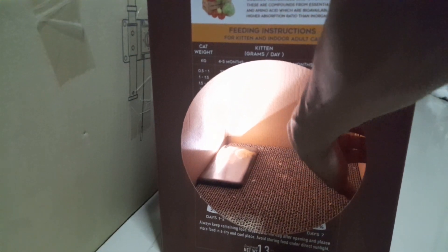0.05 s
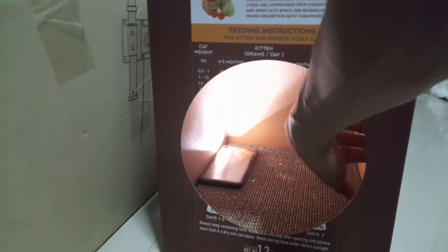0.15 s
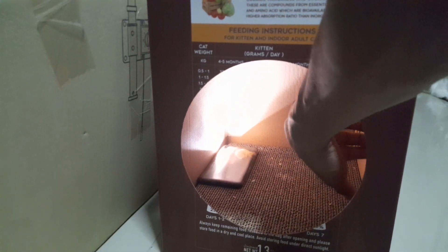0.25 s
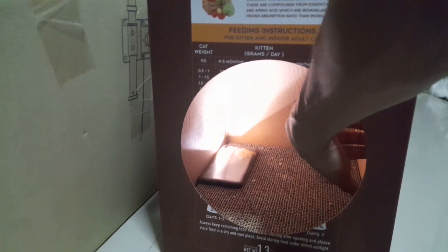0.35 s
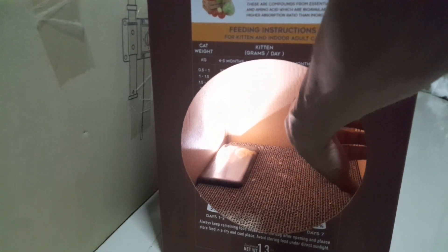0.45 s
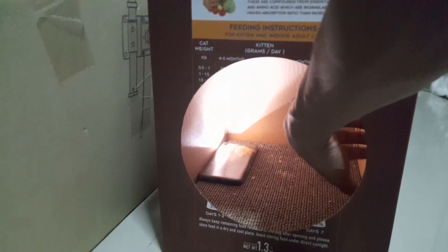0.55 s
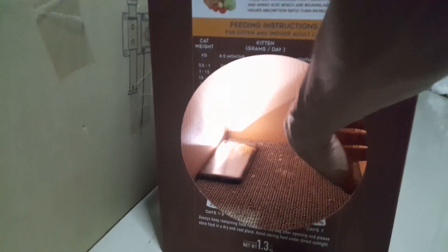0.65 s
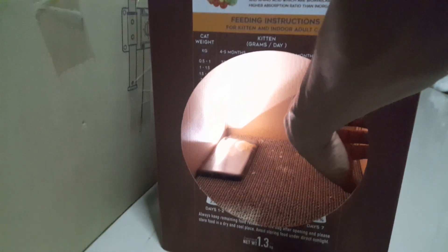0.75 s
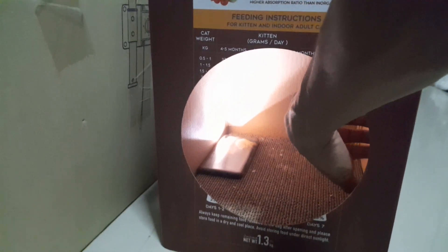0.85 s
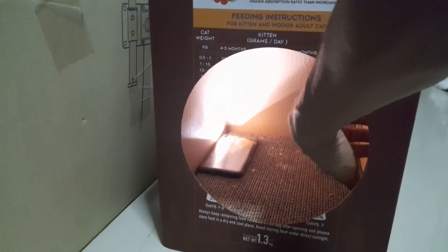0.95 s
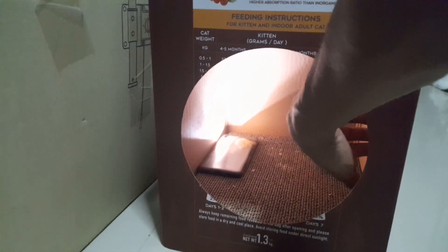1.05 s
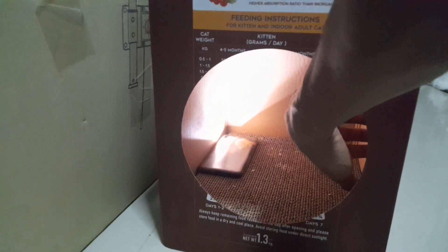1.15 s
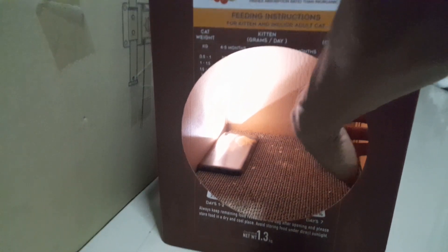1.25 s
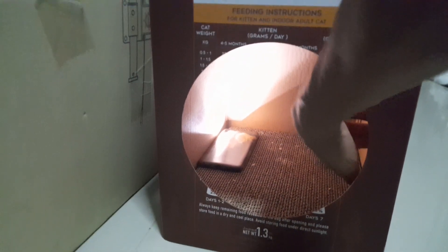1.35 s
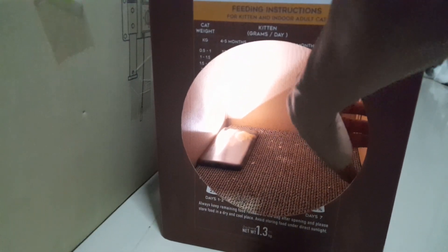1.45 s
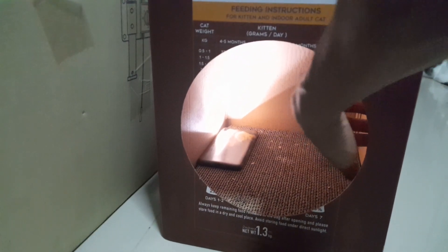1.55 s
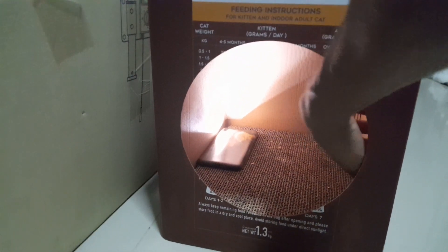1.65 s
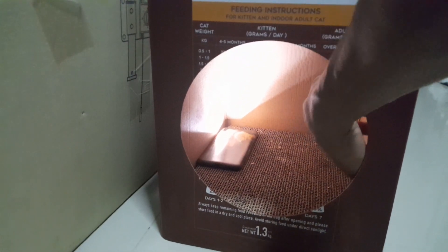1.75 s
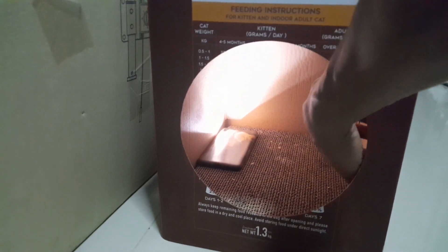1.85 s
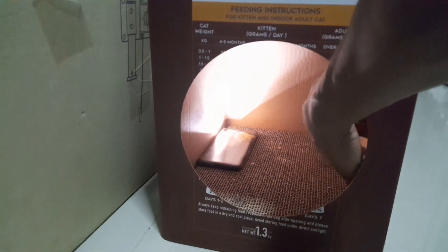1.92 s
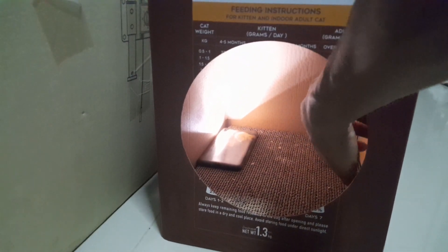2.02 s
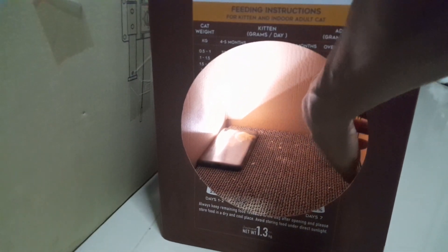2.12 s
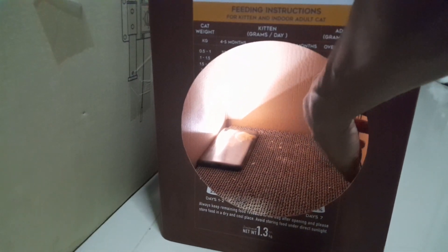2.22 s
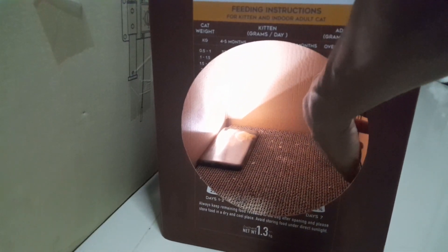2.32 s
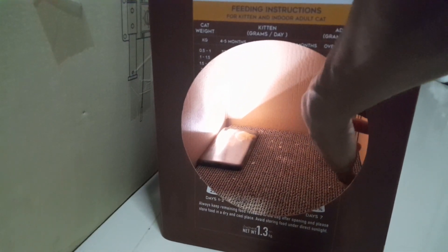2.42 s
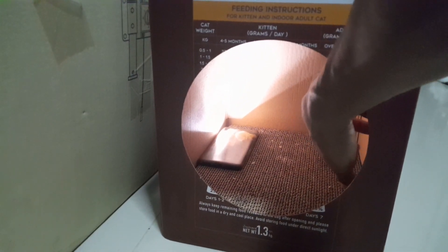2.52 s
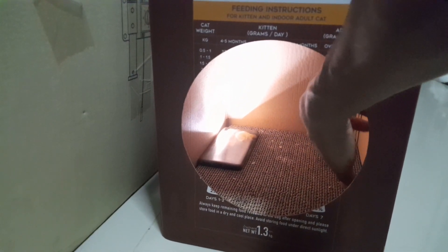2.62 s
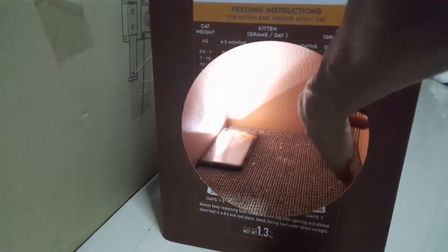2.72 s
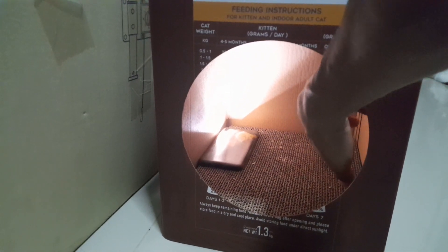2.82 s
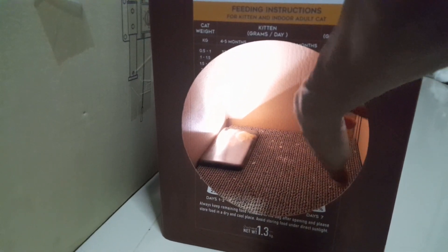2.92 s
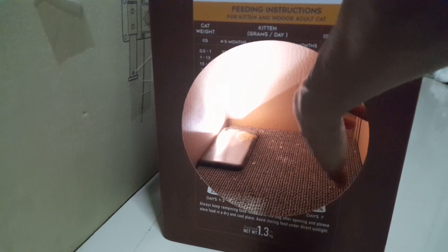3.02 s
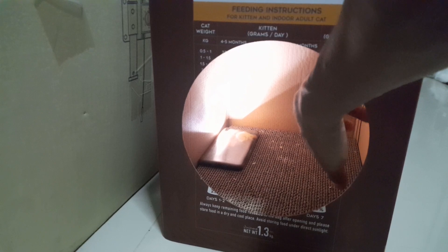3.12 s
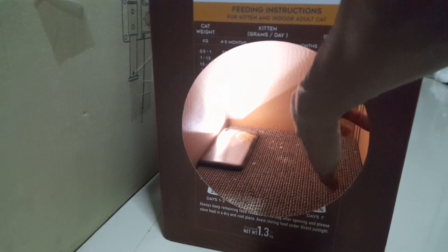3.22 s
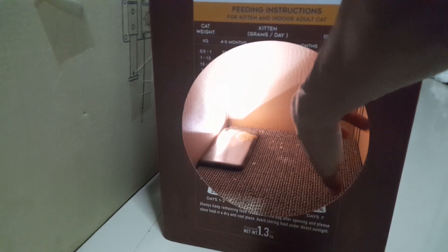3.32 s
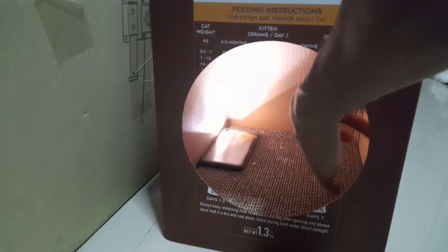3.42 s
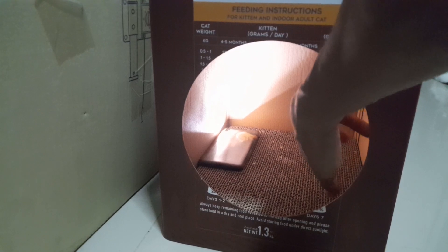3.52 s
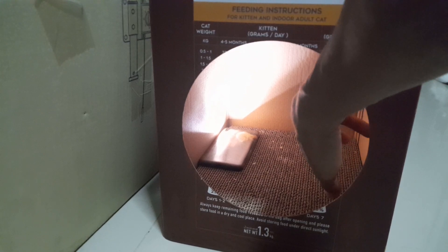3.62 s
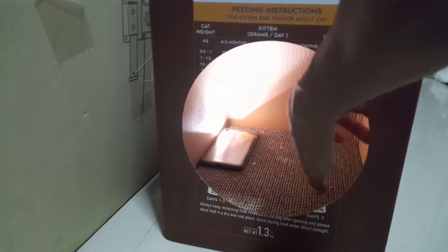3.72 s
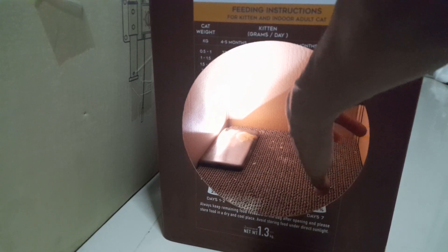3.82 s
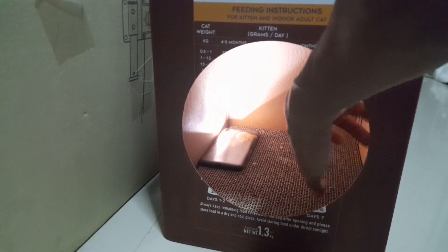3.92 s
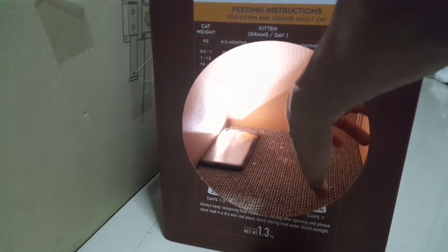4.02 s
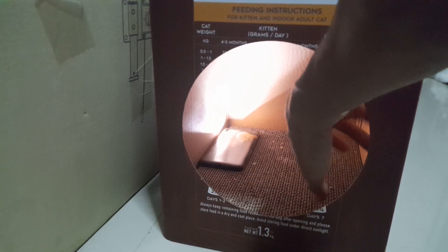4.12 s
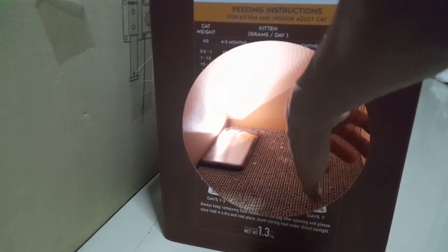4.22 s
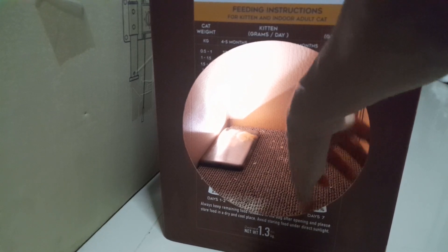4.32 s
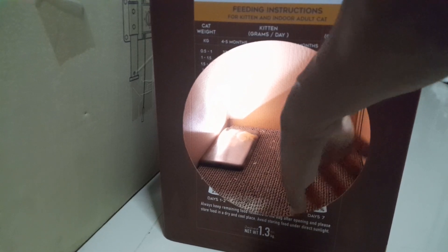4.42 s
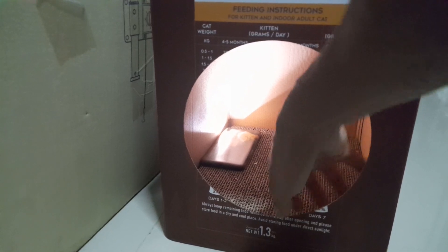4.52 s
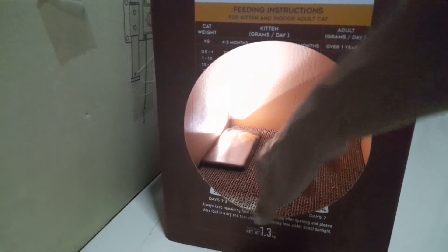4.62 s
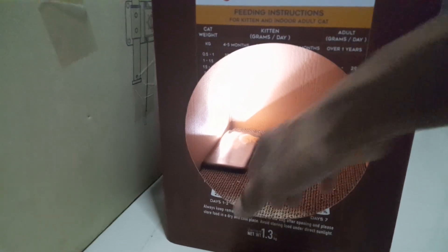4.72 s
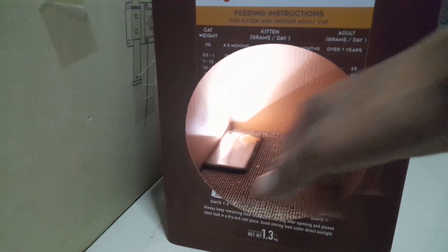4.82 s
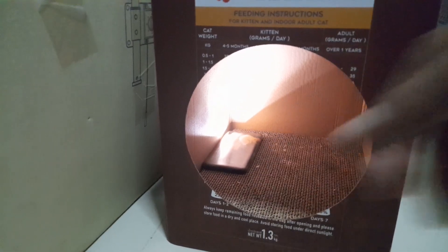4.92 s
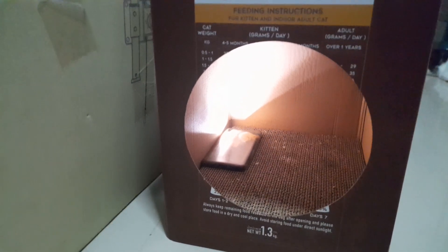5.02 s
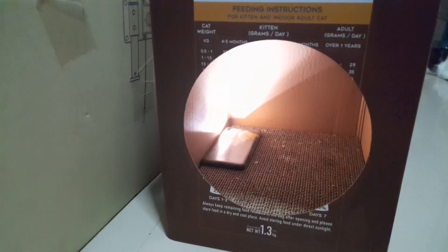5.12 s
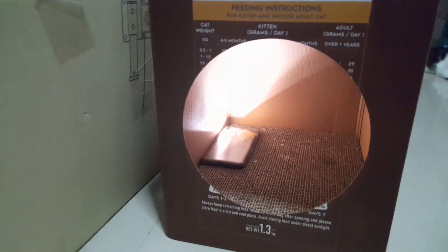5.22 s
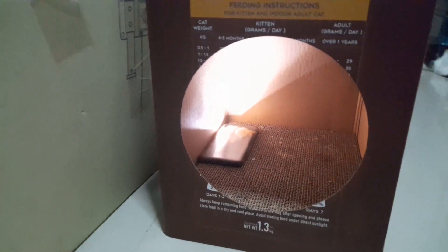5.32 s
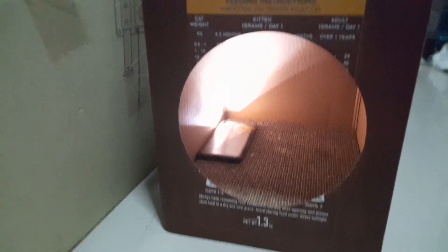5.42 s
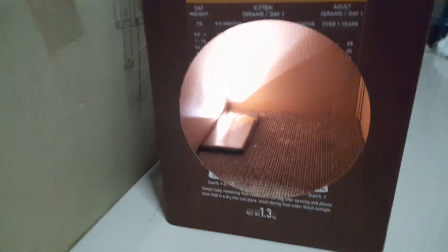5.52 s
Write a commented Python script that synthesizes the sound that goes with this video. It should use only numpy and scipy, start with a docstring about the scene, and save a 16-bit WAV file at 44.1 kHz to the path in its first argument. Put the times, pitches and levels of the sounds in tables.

```python
"""A resting hand rubs softly over the hush of a room, and almost at once fingertips begin to scratch,
quickly and unevenly, over the open flutes of a corrugated pad inside a cardboard box.
Each stroke bumps over ridge after ridge: a row of pushes makes the pad thrum at a gliding rate.
Skin and nails scrape the paper fibres, made as shaped noise; caught nails knock on pad and box.
Shoves of the hand add louder rubbing and a low sway of the box."""
import sys
import numpy as np
from scipy import signal
from scipy.fft import rfft
from scipy.io import wavfile
from scipy.ndimage import uniform_filter1d

SR = 44100
rng = np.random.default_rng(int(sys.argv[2]) if len(sys.argv) > 2 else 0)


def magnitude_from_level(level_db):
    """Linear magnitude for a level in decibels (20 dB per decade)."""
    exponent = np.asarray(level_db, float) / 20
    return 10 ** exponent


def materialize(psi):
    """Save the field psi as 16-bit PCM at rate SR to the path in sys.argv[1].

    A 1-D psi becomes a single channel; in a 2-D psi each row is a channel.
    """
    bounded = np.clip(np.atleast_2d(psi).T, -1, 1)
    quanta = np.round(bounded * 32767).astype(np.int16)
    wavfile.write(sys.argv[1], SR, quanta)


N = 245189
T = np.arange(N) / SR  # time of each sample, s
HZ = np.fft.rfftfreq(2048, 1 / SR)  # frequencies of the noise spectra
FRAMES = np.arange(N // 512 + 5) * 512 / SR  # times of the noise spectra, s

# Levels in these tables are relative; each layer may add its own gain and random changes.
# the resting hand: (t/s, level of the rub/dB)
HAND_REST = [(0.0, -38.5), (0.3, -46.5), (0.57, -45), (0.9, -42), (1.21, -48), (1.5, -52), (1.6, -80),
             (1.79, -44), (2.07, -50.5), (2.35, -60), (2.7, -47), (2.93, -52.5), (3.27, -34), (3.38, -45),
             (3.55, -45.5), (4.01, -46), (4.26, -61), (4.41, -47), (4.55, -59), (4.89, -98), (5.25, -78),
             (5.34, -62), (5.56, -53)]
# the hand shoves the pad and rocks the box: (t of peak/s, rub level/dB, length/ms, box sway level/dB)
HAND_SHOVES = [(0.085, -35.5, 83, -34.5), (0.402, -27, 94, -35), (0.73, -25.5, 103, -42),
               (0.96, -48, 58, -42), (1.068, -26, 120, -38), (1.42, -39, 93, -39), (1.55, -47, 44, -41),
               (2.12, -42.5, 200, -44), (2.35, -60, 170, -41.5), (2.46, -40, 210, -59),
               (3.02, -59, 140, -45.5), (3.18, -34, 48, -38), (3.47, -34, 74, -40), (3.58, -47, 110, -42.5),
               (3.74, -37.5, 65, -51), (3.9, -46, 54, -37)]
# low modes of the pad: (f/Hz, width/Hz, level under the palm/dB, level with the palm lifted/dB)
PAD_MODES = [(107, 33, -8, -3.5), (138.7, 39.4, 5, 2.5), (175, 54, 1.5, -1.5), (220, 57.6, 0, 3.5),
             (308.3, 28.6, -13.5, -6.5), (339.6, 43.6, -10, -1.5)]
# low sway of the box: (f/Hz, width/Hz, level under the palm/dB, level with the palm lifted/dB)
SWAY_MODES = [(64.5, 61, 0, 0)]
# spectrum of the room: (f/Hz, level/dB)
ROOM_SPECTRUM = [(30, 1.5), (60, -2), (90, -2.5), (127, 0.5), (225, -7), (420, -7.5), (480, -10.5),
                 (540, -10.5), (1270, -19.5), (3420, -28.5), (4110, -21), (5500, -22.5), (8600, -43.5),
                 (10000, -19), (11500, -26.5), (14000, -22.5), (15600, -64)]
# thrum of one stroke, or the pad's after-ring following it:
# (t of peak/s, level/dB, length/ms, early rate/Hz, late rate/Hz)
THRUMS = [(0.015, -37.5, 22, 158, 172), (0.103, -21, 13.8, 179.4, 184), (0.142, -32.5, 41, 158.2, 177),
          (0.281, -29, 31, 167.2, 163), (0.41, -20, 27, 162.8, 160), (0.484, -28.5, 26, 158.5, 181),
          (0.573, -27.5, 13.4, 200.5, 195), (0.69, -36.5, 39.5, 168, 180), (0.757, -25.5, 54, 189.4, 188),
          (0.889, -31.5, 38, 178.4, 181), (1.086, -48, 100, 194.7, 189), (1.38, -36, 43, 216.4, 201),
          (1.418, -35, 42, 243.8, 164), (1.453, -39.5, 21, 183, 202), (1.96, -39, 83, 175, 126.5),
          (2.042, -35, 32, 128, 137), (2.232, -31.5, 26, 145.7, 147), (2.399, -20, 35.3, 140.7, 187),
          (2.435, -27, 20, 202.6, 214), (2.575, -26, 25, 153.3, 139), (2.675, -28, 45, 149.5, 166.3),
          (2.719, -31.5, 20, 159, 165), (2.793, -29.5, 21.5, 279, 232), (2.951, -27, 13, 171.8, 170),
          (3.041, -21, 16, 299.7, 212), (3.08, -34, 28, 175, 143), (3.204, -14.5, 25.1, 153.9, 218.5),
          (3.281, -35, 66, 216, 160), (3.341, -36.5, 46, 143.2, 160), (3.431, -9, 25, 175, 297),
          (3.575, -32.5, 25, 139.8, 180), (3.613, -31, 18.7, 154.3, 168), (3.706, -13, 26, 164.1, 203),
          (3.924, -11.5, 18.4, 151.6, 292), (3.971, -27, 30, 290, 257), (4.009, -45, 44, 210, 220),
          (4.054, -25.5, 13, 269, 220), (4.143, -19, 29, 148.3, 207), (4.216, -41.5, 55, 186.6, 185),
          (4.289, -29, 21, 301, 232), (4.325, -44, 34, 242.2, 231), (4.549, -46, 40, 170.2, 226)]
# scrape of one stroke: (t of peak/s, level/dB, length/ms, dull fingertip level against the nail/dB)
SCRAPE_STROKES = [(0.075, -49.5, 91, 10), (0.272, -51, 71, 12.5), (0.392, -46, 88, 4.5),
                  (0.573, -47.5, 27, 12.5), (0.648, -51.5, 13, 14.5), (0.731, -47, 80, 6.5),
                  (0.878, -46, 32, 2), (0.991, -51, 20, -10), (1.029, -37.5, 7.4, 8), (1.426, -48, 80, 5),
                  (1.541, -58, 68, 12.5), (1.684, -57, 20, 6.5), (1.844, -42, 69, -38),
                  (1.91, -50.5, 100, 10), (1.982, -54, 23, 17), (2.034, -49, 41, 14.5),
                  (2.222, -44.5, 29, -2.5), (2.375, -41, 62, 4.5), (2.493, -72, 150, 27.5),
                  (2.578, -48, 38, 3.5), (2.668, -45, 56, 10.5), (2.789, -53.5, 28, 13),
                  (2.941, -48, 34, 8.5), (3.044, -56, 19, 21.5), (3.086, -47.5, 38, 7),
                  (3.184, -40.5, 41, 9.5), (3.301, -50.5, 56, -5), (3.422, -36.5, 35.4, 5.5),
                  (3.575, -48.5, 18, -1), (3.693, -38, 35.4, 5), (3.918, -42, 36, 13.5),
                  (4.052, -61, 15, 32), (4.133, -49, 46, 15), (4.558, -55, 14, 13.5), (5.44, -59, 156, 6.5)]
# a nail catches on a ridge: (t/s, level/dB, knock level on the pad against that/dB)
NAIL_CATCHES = [(0.09, -36.5, 27), (0.547, -44, -1), (0.645, -36, 14), (0.676, -36, 15), (0.733, -42, -1),
                (0.865, -37, -9), (1.026, -38, 1), (1.05, -27.5, 5), (1.071, -27.5, -12),
                (1.366, -37.5, 12), (1.513, -43, -4), (1.68, -43, -12), (1.827, -37, 1), (1.951, -32, -6),
                (2.011, -40, -8), (2.323, -33.5, -17), (2.347, -40, 1), (2.482, -53, 1), (2.634, -32.5, 0),
                (2.78, -44.5, 11), (2.924, -38, 8), (3.034, -48.5, 24.5), (3.152, -34, -2),
                (3.255, -39.5, -4), (3.402, -45, 5), (3.565, -36.5, 9), (3.671, -36, -14), (3.89, -34, -7),
                (4.046, -34.5, 17.5), (4.11, -46, 13), (4.274, -43.5, 15.5), (4.554, -38, 9)]
# spectrum of scraped paper: (f/Hz, level in each Hz/dB)
PAPER_SPECTRUM = [(90, -1), (220, 10), (380, -2.5), (458, -11), (654, -9), (1110, -21.5), (1260, -17.5),
                  (1470, -18), (1770, -23.5), (2030, -28.5), (3230, -27.5), (3490, -28), (6110, -33),
                  (10000, -23), (14300, -34.5), (15500, -29.5)]
# box walls and air: (f/Hz, width/Hz, level over the paper at the first spot/dB, at the second/dB)
BOX_MODES = [(473.6, 28.7, 17, 12.1), (619, 48, 4.5, 9), (761, 42, 7, 8.7), (858, 46, 12, 2),
             (996, 60, 1, 8.4), (1214, 70, -3, 3.4), (1530, 17, -13, 6.4), (1790, 15, -1, 11.6),
             (2310, 270, 6.5, 6.7), (2620, 27, -22, 8.6), (2850, 43, 8, 3.8), (3300, 14, 13, 2.6),
             (3560, 28, 0.5, 1.2), (3870, 16, -11, 2.2), (3676, 86, 9.5, 1.4), (3970, 16, 15, 0.8)]
# where the fingers are: (t/s, level of left over right/dB)
FINGER_PLACE = [(0.0, -4.5), (1.47, -6), (1.69, 4.5), (1.95, -3), (3.6, -4), (4.81, -2.5), (5.56, -4.0)]
# how alike left and right noise are: (f/Hz, likeness from 0 to 1)
LIKENESS = [(60, .7), (130, .86), (290, .82), (640, .62), (1410, .55), (3100, .5), (5500, .4), (8000, .74),
            (15000, .88)]
# phase of the left channel ahead of the right in the noise: (f/Hz, phase/rad)
LEFT_LEAD = [(0, 0), (780, -.1), (1290, -1.2), (1720, -6.2), (2150, -7.6), (2580, -7.5), (2930, -5.3),
             (3450, -7.8), (3880, -7.3), (4570, -4.3), (5170, -3.8), (5860, -1.7), (7060, 0), (15300, 0)]
# balance of the noise: (f/Hz, level of left over right/dB)
LEFT_BALANCE = [(60, 5), (130, -4), (290, -1), (640, -0.5), (1410, -4), (3100, 1), (6820, -3.5),
                (15000, 2.5)]

MOVE_S = 1.41  # the hand shifts to another spot of the pad
LIFT_S = 3.25  # the palm lifts, and the pad rings higher
THRUM_RISE, SCRAPE_RISE, SHOVE_RISE = 0.53, 0.49, 0.4  # share of its length in which each one builds up
PAD_LOW_HZ, PAD_TOP_HZ = 128, 362  # band of the thrum
FINE_DB = -14.5, -10.5, -6.5  # fine hiss against the scrape: first spot, second spot, palm lifted
FINE_PER_DULL = 0.13  # dB of fine hiss for each dB of dull fingertip
CATCH_T60_MS = 87  # time in which a catch fades by 60 dB
KNOCK_LOW_HZ = 116  # knocks are kept free of bass below this
HUSH_DB = -53
# layers that follow the rub: dB at the reference rub, and dB gained for each dB of rub
REFERENCE_RUB_DB = -45
SWAY_DB, SWAY_PER_RUB = -51.5, 0.56
WHISPER_DB, WHISPER_PER_RUB = (-53.5, -60, -60.5), (0.76, 0.52, 0.14)  # dull, paper, fine
BASS_CUT_HZ, TREBLE_CUT_HZ = 41, 15000  # low and high limit of the finished sound


def evened(x):
    """Scales a signal to rms 1."""
    return x / np.sqrt(np.mean(x ** 2) + 1e-20)


def read(points, hz):
    """Reads a spectrum table, drawing straight lines along a log-frequency axis."""
    f, value = np.transpose(points)
    return np.interp(np.log(hz + 1), np.log(f + 1), value)


def spot(t, move_s):
    """0 before the hand moves on, 1 after, with a slide of 0.2 s between."""
    return np.clip((t - move_s) / 0.2, 0, 1)


def peak(hz, width):
    """Power of one resonance: highest at hz, half as high at half a width to either side."""
    return 1 / (1 + (2 * (HZ[:, None] - hz) / width) ** 2)


def modes(table):
    """Magnitude of a set of steep resonances, changing as the palm lifts."""
    lifted = spot(FRAMES, LIFT_S)
    power = 0
    for hz, width, pressed_db, lifted_db in table:
        level_db = pressed_db + (lifted_db - pressed_db) * lifted
        power = power + magnitude_from_level(2 * level_db) * peak(hz, width) ** 2
    return np.sqrt(power)


def wobble(ms):
    """Smooth chance of rms 1: random numbers averaged twice over ms."""
    size = max(int(ms * SR / 1000), 1)
    once = uniform_filter1d(rng.standard_normal(N), size=size)
    return evened(uniform_filter1d(once, size=size))


def hiss(gain, patchy_db):
    """Two-channel noise of rms 1 with the given spectrum (bins x frames) and drifting patches."""
    a, b, c, d, patches = rng.standard_normal((len(FRAMES), len(HZ), 5)).T
    patches = uniform_filter1d(patches, size=7, axis=0)
    patches = evened(uniform_filter1d(patches, size=5, axis=1))
    same = np.clip(read(LIKENESS, HZ), -1, 1)[:, None]
    late = np.exp(-1j * read(LEFT_LEAD, HZ))[:, None]
    left = a + 1j * b
    right = same * late * left + np.sqrt(1 - same ** 2) * (c + 1j * d)
    side = magnitude_from_level(np.outer([0.5, -0.5], read(LEFT_BALANCE, HZ)))[..., None]
    spectra = np.array([left, right]) * side * gain * magnitude_from_level(patchy_db * patches)
    return evened(signal.istft(spectra, nperseg=2048, noverlap=1536)[1][:, :N])


def swell(s, rise_ms, fall_ms, sharp_in, sharp_out):
    """Pressure that swells and fades, 6 dB down a rise before and a fall after its peak."""
    span = slice(max(round((s - rise_ms * 6e-3) * SR), 0), round((s + fall_ms * 8e-3) * SR))
    early = T[span] < s
    u = (T[span] - s) * 1000 / np.where(early, rise_ms, fall_ms)  # -1 a rise before, 1 a fall after
    return span, u, magnitude_from_level(-6 * abs(u) ** np.where(early, sharp_in, sharp_out))


def hand():
    """Levels of rub and box sway in dB: the power of the resting weight plus that of every shove."""
    rest_db = np.interp(T, *np.transpose(HAND_REST))
    rest_sway_db = SWAY_DB + SWAY_PER_RUB * (rest_db - REFERENCE_RUB_DB)
    power = magnitude_from_level(2 * np.array([rest_db, rest_sway_db]))
    for s, rub_db, length, sway_db in HAND_SHOVES:
        span, _, shape = swell(s, SHOVE_RISE * length, (1 - SHOVE_RISE) * length, 1.28, 3.3)
        power[:, span] += np.outer(magnitude_from_level([rub_db, sway_db]), shape) ** 2
    return 10 * np.log10(power)


def hand_rub(rub_db):
    """The hand rubs the pad: noise coloured by the pad's low modes."""
    lumps_db = 3.5 * wobble(33)  # the hand's weight shifts from ridge to ridge
    return magnitude_from_level(rub_db + lumps_db) * hiss(modes(PAD_MODES), 0.95)


def box_sway(sway_db):
    """The hand rocks the box: noise in one low resonance."""
    return magnitude_from_level(sway_db) * hiss(modes(SWAY_MODES), 0.62)


def room_hush():
    """The hush of the room: noise of a fixed spectrum with small patches."""
    return magnitude_from_level(HUSH_DB) * hiss(magnitude_from_level(read(ROOM_SPECTRUM, HZ))[:, None], 0.6)


def ring(table, damping, skew):
    """Left and right answer of (f/Hz, width/Hz, level/dB) modes to one push, with a left peak gain of 1."""
    t = T[:SR // 4]
    lead = np.array([[skew], [-skew]])  # rad, opposite in the two channels
    answer = 0
    for k, (hz, width, db) in enumerate(table):
        fade = np.exp(-np.pi * width * damping * t)
        answer = answer + magnitude_from_level(db) * fade * np.sin(2 * np.pi * hz * t + lead * (-1) ** k)
    soft_start = np.minimum(t / 0.00088, 1)
    return answer * soft_start / abs(rfft(answer[0])).max()


def on_pad(drive, damping):
    """The pad rings to a force, with the modes of a pressed pad first and of a freer one later."""
    free = spot(T, LIFT_S)
    out = 0
    for k, part in enumerate([drive * (1 - free), drive * free]):
        answer = ring([(hz, width, db[k]) for hz, width, *db in PAD_MODES], damping, 0.099)
        out = out + signal.oaconvolve(part[None], answer, axes=1)[:, :N]
    return out


def thrum():
    """A gliding row of pushes, as a finger drops over ridges or the pad rings on after it, excites the pad."""
    drive = np.zeros(N)
    uneven, bumpy = wobble(3.0), wobble(2.25)  # chance in the rate and in the push
    for s, db, length, early_hz, late_hz in THRUMS:
        span, u, press = swell(s, THRUM_RISE * length, (1 - THRUM_RISE) * length, 1.8, 1.7)
        rate = early_hz + (late_hz - early_hz) * np.clip(u / 1.82 + 0.5, -0.15, 1.4)
        turns = np.cumsum(rate * (1 + 0.082 * uneven[span])) / SR
        phase = 2 * np.pi * (turns + rng.random())
        push = np.cos(phase) + 0.5 * np.cos(2 * phase + 1.64) + 0.57 * np.cos(3 * phase + 0.12)
        drive[span] += magnitude_from_level(db + 4.5 + 1.84 * bumpy[span]) * press * push
    out = magnitude_from_level(-7.5) * drive + magnitude_from_level(2) * on_pad(drive, 0.86)
    band = signal.butter(4, [PAD_LOW_HZ, PAD_TOP_HZ], "band", fs=SR, output="sos")
    return signal.sosfiltfilt(band, out)


def scrape_whisper(rub_db):
    """The rubbing hand, resting or shoving, whispers on the paper: dull, paper and fine follow the rub."""
    return magnitude_from_level(np.array(WHISPER_DB)[:, None] + np.outer(WHISPER_PER_RUB, rub_db - REFERENCE_RUB_DB))


def scrape_power(whisper):
    """Power of dull, paper and fine scraping: strokes and whisper, broken into snags, plus caught nails."""
    power = np.zeros((3, N))
    for s, db, length, dull_db in SCRAPE_STROKES:
        fine_db = FINE_DB[int(s > MOVE_S) + int(s > LIFT_S)] + FINE_PER_DULL * dull_db
        # the finger lands abruptly and trails off
        span, _, shape = swell(s, SCRAPE_RISE * length, (1 - SCRAPE_RISE) * length, 2.6, 1.3)
        power[:, span] += np.outer(magnitude_from_level(db + np.array([dull_db, 0, fine_db])), shape) ** 2
    power += whisper ** 2
    # small snags at random, about 150 a second, gone in a few ms
    snag_size = magnitude_from_level(2 * (-2 + 3.8 * np.minimum(rng.exponential(1, N), 2.2)))
    snags = (rng.random(N) < 150 / SR) * snag_size
    snags = signal.lfilter([1], [1, -np.exp(-1 / (0.0011 * SR))], snags)
    power *= 1 + np.outer([0.35, 1.1, 0.4], snags)
    for s, db, _ in NAIL_CATCHES:
        span = slice(round(s * SR), round(s * SR) + SR // 8)
        fade = magnitude_from_level(db - 60e3 * T[:SR // 8] / CATCH_T60_MS)
        power[:, span] += np.outer(magnitude_from_level([-10, -10, -19]), fade) ** 2
    # the room keeps the scrape a moment: 60 dB down in 0.12 s
    tail = np.exp(-T[:SR // 4] * np.log(1e6) / 0.12)
    return power + magnitude_from_level(-29) * signal.oaconvolve(power, tail[None] / tail.sum(), axes=1)[:, :N]


def scrape(whisper):
    """Fibres catch and let go in clumps; harder nails brighten a stroke, the soft fingertip dulls it."""
    moved = spot(FRAMES, MOVE_S)
    rings = 1
    for hz, width, first_db, second_db in BOX_MODES:
        rings = rings + (magnitude_from_level(first_db + (second_db - first_db) * moved) - 1) * peak(hz, width)
    paper = magnitude_from_level(read(PAPER_SPECTRUM, HZ))[:, None] * rings
    dull = 1 / (1 + (HZ / 1000) ** 6)
    fine = 1 / (1 + (6000 / (HZ + 1)) ** 8)
    middle = np.clip(1 - dull - fine, 0, 1)
    press = np.sqrt(abs(scrape_power(whisper)))
    grit = magnitude_from_level(0.31 * wobble(2.4))
    out = 0
    for level, share in zip(press, [dull, middle, fine]):
        out = out + level * hiss(paper * np.sqrt(share)[:, None], 2.7)
    return grit * out


def knocks():
    """A caught nail taps the pad and, more faintly, the walls of the box; both ring to single pushes."""
    pad_taps, wall_taps = np.zeros((2, N))
    for s, db, knock_db in NAIL_CATCHES:
        pad_taps[round(s * SR)] = magnitude_from_level(db + knock_db)
        wall_taps[round(s * SR)] = magnitude_from_level(db)
    wall_modes = [(hz, width, db + read(PAPER_SPECTRUM, hz)) for hz, width, _, db in BOX_MODES]
    walls = ring(wall_modes, 1.8, 1.0)
    rattle = signal.oaconvolve(wall_taps[None], walls / abs(walls).max(), axes=1)[:, :N]
    bass_cut = signal.butter(3, KNOCK_LOW_HZ, "high", fs=SR, output="sos")
    thud = signal.sosfilt(bass_cut, on_pad(pad_taps, 0.42))
    return magnitude_from_level(40.0) * thud + magnitude_from_level(-12.5) * rattle


def placed(pair):
    """Leans the sound left or right with the fingers."""
    return pair * magnitude_from_level(np.outer([0.5, -0.5], np.interp(T, *np.transpose(FINGER_PLACE))))


def scene():
    """Adds up the rubbing hand, the box, the room and the thrum, scrape and knocks of the strokes."""
    rub_db, sway_db = hand()
    background = hand_rub(rub_db) + box_sway(sway_db) + room_hush()
    strokes = placed(thrum() + knocks()) + scrape(scrape_whisper(rub_db))
    return background + strokes


def band_limit(x):
    """A steep low-pass at the top of the band."""
    return signal.sosfilt(signal.butter(12, 15780, fs=SR, output="sos"), x)


def record(dry):
    """The finished sound loses its deepest bass and its top treble."""
    bass_cut = signal.butter(4, BASS_CUT_HZ, "high", fs=SR, output="sos")
    treble_cut = signal.butter(12, TREBLE_CUT_HZ, fs=SR, output="sos")
    mix = signal.sosfilt(treble_cut, signal.sosfilt(bass_cut, dry))
    return band_limit(mix)


dry = scene()
out = record(dry)
materialize(out)
```